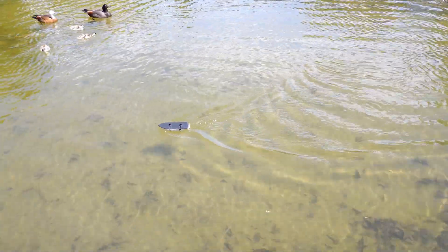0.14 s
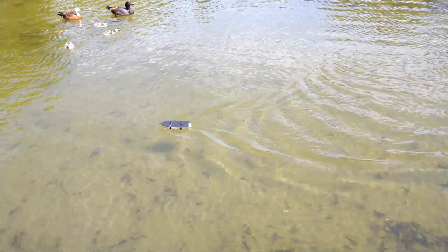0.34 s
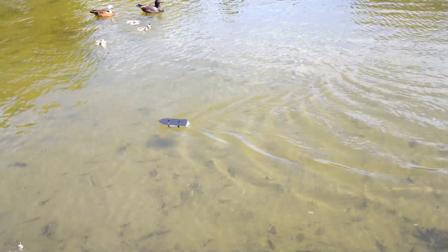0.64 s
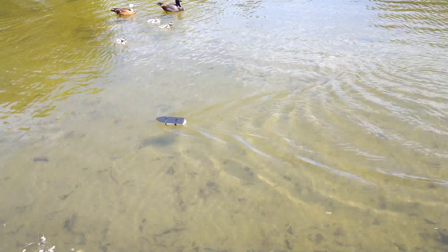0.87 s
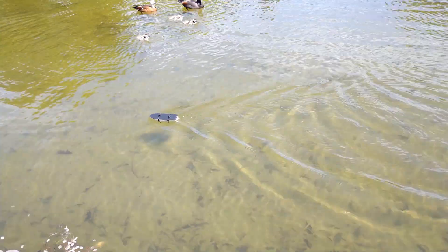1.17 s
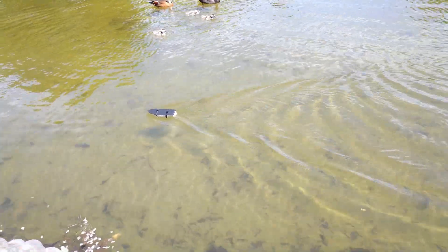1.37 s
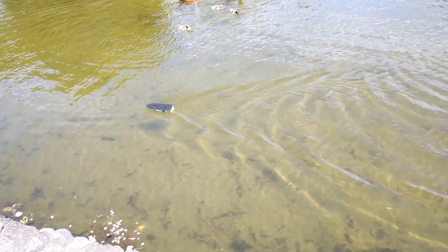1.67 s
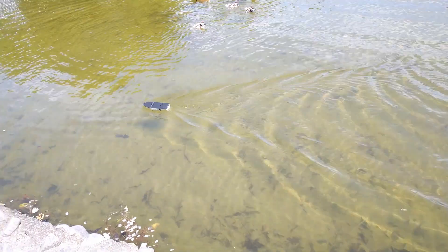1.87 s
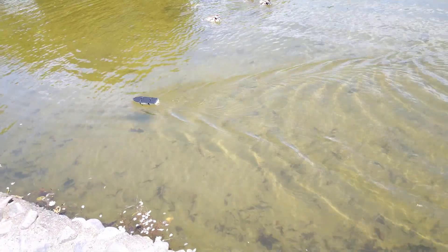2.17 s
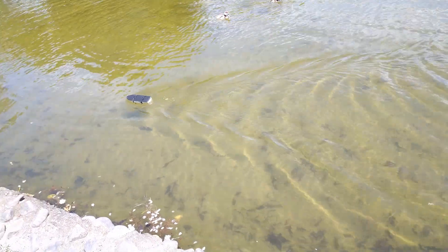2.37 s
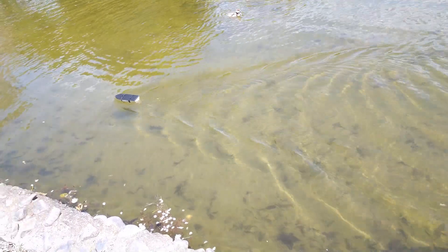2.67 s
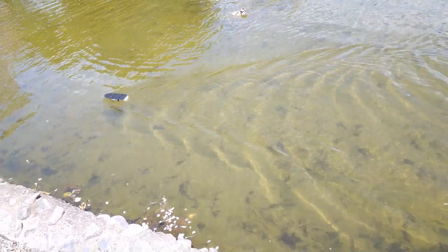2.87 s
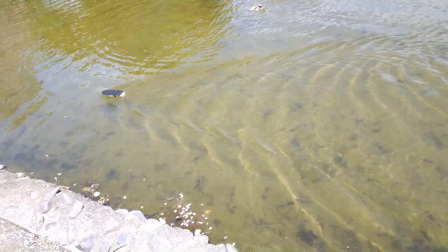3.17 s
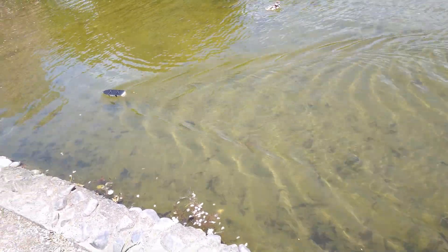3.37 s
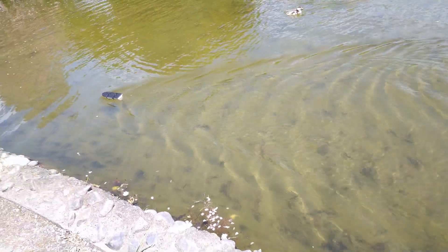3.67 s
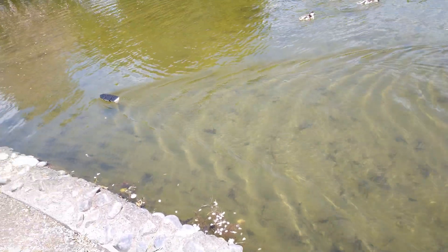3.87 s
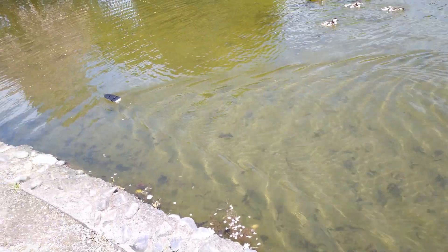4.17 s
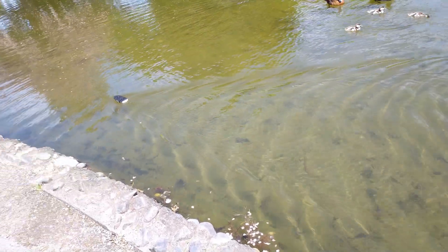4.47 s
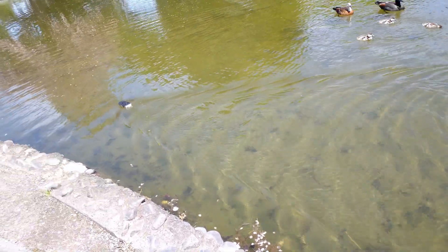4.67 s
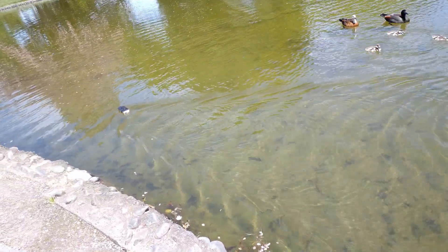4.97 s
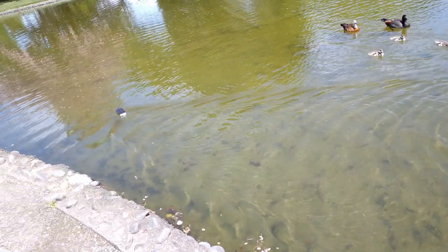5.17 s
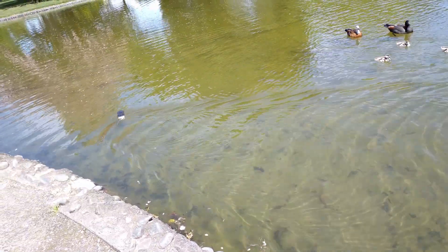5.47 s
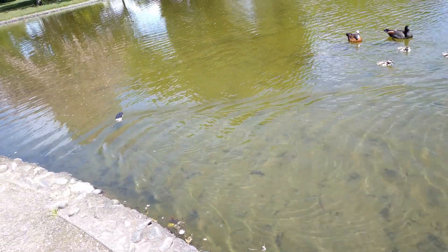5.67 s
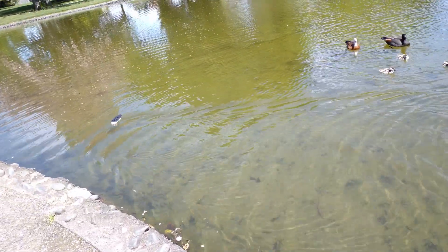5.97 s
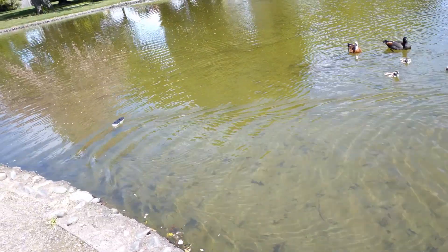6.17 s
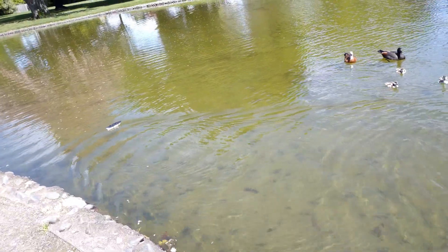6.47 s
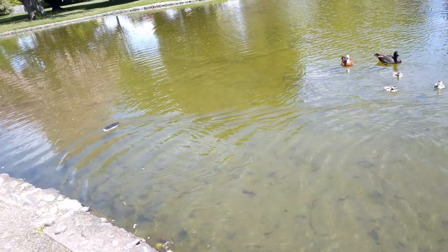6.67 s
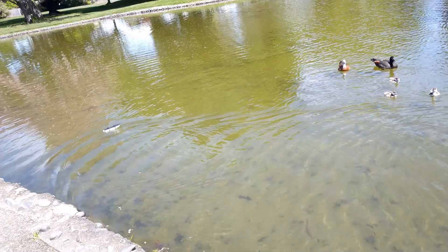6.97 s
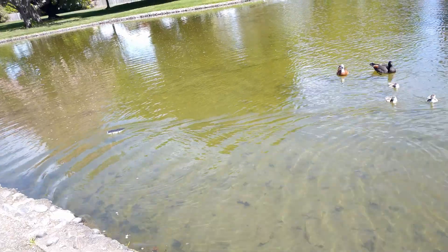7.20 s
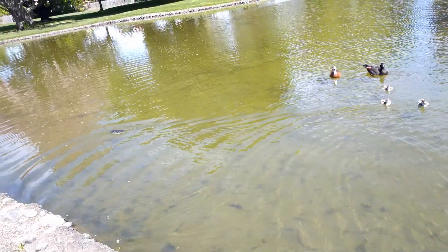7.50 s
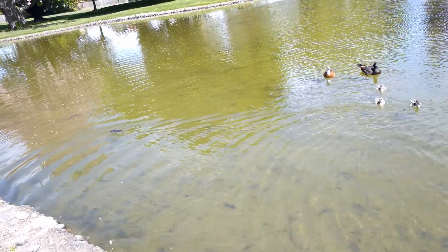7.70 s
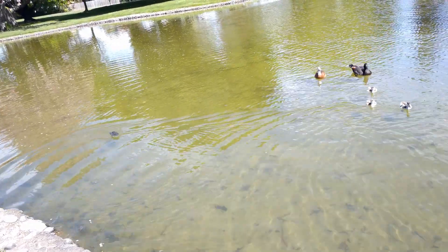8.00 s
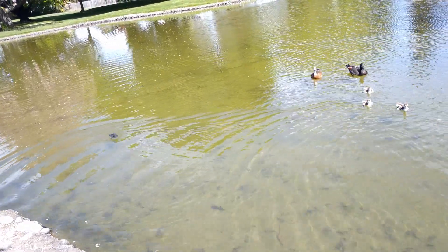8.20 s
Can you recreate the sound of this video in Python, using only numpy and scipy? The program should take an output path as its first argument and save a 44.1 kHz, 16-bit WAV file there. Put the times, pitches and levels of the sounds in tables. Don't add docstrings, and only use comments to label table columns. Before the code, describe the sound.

Outdoors by a park pond, a toy boat's small electric motor whines high and nasal with gritty brush hiss, wavering and weakening as it turns away. It coasts down and stops just after four seconds. Songbirds chirp throughout, small ripples plip against the stone edge, leaves rustle, and a far engine drone grows underneath. Small handheld microphone, dull above eight kilohertz.

```python
import sys
import numpy as np
from scipy import signal
from scipy.io import wavfile
from scipy.ndimage import uniform_filter1d, map_coordinates

SR = 44100
rng = np.random.default_rng(int(sys.argv[2]) if len(sys.argv) > 2 else 0)


def bounce(signal):
    frames = np.transpose(np.atleast_2d(signal))
    limited = np.clip(frames, -1, 1)
    pcm = np.round(limited * 32767).astype(np.int16)
    wavfile.write(sys.argv[1], SR, pcm)


def field_ratio(decibels):
    return 10 ** (np.asarray(decibels, dtype=float) / 20)


N = 367980


def unit(x):
    return x / np.sqrt(np.mean(x ** 2))


def curves(table):
    s, *columns = np.transpose(table)
    return [np.interp(np.arange(N) / SR, s, c, right=c[-1]) for c in columns]


def beam(t0, t1, in_db, before_db, after_db, edge_s):
    t = np.arange(N) / SR
    step_on = .5 + .5 * np.tanh((t - t0) / edge_s)
    step_off = .5 + .5 * np.tanh((t - t1) / edge_s)
    return before_db + (in_db - before_db) * step_on + (after_db - in_db) * step_off


def walk(rate_hz):
    held = 1.2 * rng.standard_normal(1100)
    return np.interp(np.arange(N) * (rate_hz / SR), np.arange(len(held)), held)


def band(x, hz, width_hz):
    return signal.lfilter(*signal.iirpeak(hz, hz / width_hz, fs=SR), x)


def steep_band(x, hz, width_hz):
    return band(band(x, hz, width_hz), hz, width_hz)


def hiss(hz, width_hz):
    return unit(steep_band(rng.standard_normal(N), hz, width_hz))


def add(out, s, piece):
    i = int(s * SR)
    out[i:i + len(piece)] += piece[:N - i]


def shaft_hz():
    # t/s, shaft speed f/Hz
    speed = [(0, 259.3), (.3, 258.4), (.55, 260.5), (.7, 255.8), (1.05, 254.8), (1.42, 256.7),
             (1.67, 259.5), (1.87, 261.8), (2.03, 266), (2.66, 263.3), (2.86, 262), (2.97, 257.3),
             (3.3, 255), (3.63, 255.8), (3.69, 262.3), (3.97, 260), (4.17, 255), (4.45, 246.3)]
    # t/s, rise/s, sag/s, gain f/Hz
    surges = [
        (.3, .07, .18, 3.5),
        (1.05, 0.039, .14, 3),
        (1.42, .14, .11, 7.5),
        (1.67, .09, .11, 2),
        (2.2, .13, 0.13, -2),
        (3.06, .04, .12, 2.4),
        (3.3, .11, .18, 7.5),
        (3.97, .11, .09, 4),
    ]
    t = np.arange(N) / SR
    hz = curves(speed)[0]
    for s, rise_s, sag_s, gain_hz in surges:
        hump = np.interp(t, [s, s + rise_s, s + rise_s + sag_s], [0, 1, 0])
        hz = hz + gain_hz * np.sin(np.pi / 2 * hump)
    return hz


def commutator(turn, coast_db):
    # t/s, level/dB
    tenth_level = [(0, -43), (.2, -48.5), (.55, -48.5), (.67, -52.5), (.93, -56), (1.03, -45), (1.1, -50),
                   (1.27, -46.5), (1.4, -55.5), (1.52, -47), (1.66, -54.5), (1.86, -59), (2.03, -52.5),
                   (2.2, -61), (2.86, -63), (2.96, -51.5), (3.3, -50), (3.38, -61)]
    # multiple, early level/dB, late level/dB
    orders = [(3, -18, -18), (4, -9, -19), (7, -11, -18), (8, -6, -16), (11, -16, -12), (12, -7, -13),
              (15, -11, -17), (17, -12, -17), (23, -10, -13), (24, -15, -13), (25, -12, -16),
              (26, -14, -15), (27, -19, -21), (28, -16, -21), (29, -9, -18), (31, -16, -15), (32, -16, -22),
              (21, -11, -13)]
    base_db = -52
    strong_db = [(10, curves(tenth_level)[0]),
                 (20, beam(1.8, 3.35, in_db=-51.5, before_db=-58, after_db=-57, edge_s=.25) + coast_db),
                 (30, beam(.66, 1.46, in_db=-57, before_db=-66, after_db=-67, edge_s=.066) + coast_db)]
    out = np.zeros(N)
    for k, db in strong_db:
        out += field_ratio(db + 4.5 + 1.3 * walk(15)) * np.sin(k * turn)
    turned = np.clip((np.arange(N) / SR - 1.2) / .33, 0, 1)
    for k, early_db, late_db in orders:
        db = base_db + early_db + (late_db - early_db) * turned + coast_db / 2
        db = db + 2.5 * walk(3) + 1.5 * walk(25)
        out += field_ratio(db) * np.sin(k * turn + k * k)
    return out


def brushes(turn):
    # t from/s, t to/s, level in beam/dB, level before/dB, level after/dB
    brush_beams = [
        (0.15, 1.63, -45.5, -43.5, -49),
        (1.1, 3.6, -50.5, -49, -53.5),
        (0.6, 2.8, -55, -59, -67),
    ]
    # f/Hz, width f/Hz, level/dB
    hull = [
        [(2240, 1180, -6.5), (3060, 150, -8), (3900, 690, -12.5)],
        [(5450, 470, -3), (6500, 1800, -11)],
        [(7560, 650, 0), (8280, 420, -4)],
    ]
    scrape_db, wear_per_s = -6, 3.5
    beat = 1 + .5 * np.sin(turn)
    bumps = rng.standard_normal((40, 128))
    place = [np.arange(N) / SR * wear_per_s, turn / (2 * np.pi) % 1 * bumps.shape[1]]
    scrape = map_coordinates(bumps, place, order=1, mode="grid-wrap")
    out = np.zeros(N)
    for row, modes in zip(brush_beams, hull):
        register = np.zeros(N)
        for hz, width_hz, mode_db in modes:
            ring = beat * hiss(hz, width_hz) + field_ratio(scrape_db) * unit(steep_band(scrape, hz, width_hz))
            register += field_ratio(mode_db + 1.5 * walk(9)) * ring
        out += field_ratio(beam(*row, edge_s=.13) - 1) * register
    return out


def motor():
    throttle_off_s, coast_db_per_s = 4.1, -70
    t = np.arange(N) / SR
    turn = 2 * np.pi * np.cumsum(shaft_hz() * (1 + .00049 * walk(60))) / SR
    coast_db = coast_db_per_s * np.clip(t - throttle_off_s, 0, 1)
    running = np.clip((4.47 - t) / .14, 0, 1)
    return (commutator(turn, coast_db) + brushes(turn)) * running


def ripples():
    # t/s, peak level/dB, ring f/Hz
    plips = [(.5222, -41, 1400), (2.4095, -41, 1440), (2.969, -32.5, 1534), (3.0627, -36, 1480),
             (4.2345, -37, 1554), (4.328, -36, 1510), (4.7117, -42.5, 1620), (4.745, -41, 1540),
             (4.796, -40, 1510), (4.89, -30, 1550), (5.1592, -35, 1580), (5.247, -37, 1640),
             (5.5182, -38.5, 1560), (5.9226, -38, 1600), (6.0222, -41, 1520), (6.189, -42, 1530),
             (6.34, -37, 1680), (6.385, -48, 1470), (7.209, -40, 1440), (7.863, -33.5, 1560),
             (8.176, -42, 1510), (8.2113, -40.5, 1510), (6.203, -33.5, 1570), (2.175, -32, 1425),
             (5.408, -42, 720), (5.429, -47.5, 750)]
    # t/s, peak level/dB, ring f/Hz
    laps = [(1.5422, -39.5, 1522), (1.7912, -38, 1450), (2.6847, -39, 1480), (3.1527, -42, 1470),
            (3.3078, -41, 1640), (3.5492, -39, 1500), (4.0531, -40, 1550), (4.3898, -36, 1550),
            (4.5688, -42, 1490), (4.6666, -40, 1670), (5.2219, -42, 1670), (5.3366, -46, 1500),
            (5.4883, -42, 1480), (5.6635, -40, 1720), (5.7232, -40, 1670), (5.7427, -40, 1520),
            (5.8639, -39, 1530), (6.0096, -38, 1600), (6.156, -43, 1510), (6.3703, -41, 1570),
            (6.918, -45, 1720), (7.375, -41, 1600), (7.5521, -41, 1520), (6.5121, -40, 1550),
            (6.8708, -37, 1550), (7.7526, -40, 1480), (7.9721, -40, 1520), (8.0819, -43, 1500),
            (8.1283, -44, 1440), (8.2699, -40, 1930), (4.2133, -40, 1500), (4.408, -37, 1550),
            (4.683, -40, 1500), (4.7765, -41, 1550), (5.1242, -39, 2100), (5.262, -39, 1700),
            (5.8336, -42, 1550), (5.9823, -40, 1600), (6.5759, -43, 1550), (6.7745, -39, 1550),
            (6.9491, -40, 1600), (6.967, -41, 1550), (7.0419, -42, 1550), (7.2988, -41, 1550),
            (7.4988, -40, 1520), (7.642, -40, 1550), (7.7887, -42, 1500), (8.0645, -39, 1520),
            (7.388, -41, 1600), (7.415, -40, 2400)]
    # t/s, peak level/dB, ring f/Hz
    splashes = [(1.6759, -45, 1466), (1.855, -42.5, 1450), (2.4863, -40.5, 1480), (2.6163, -38, 1496),
                (3.024, -41, 1448), (3.2224, -39.5, 1430), (3.931, -39, 1511), (4.114, -34, 1490),
                (6.7355, -43, 1540), (7.096, -41.5, 1663), (8.008, -42, 1540), (6.385, -38.5, 1500),
                (6.418, -38.5, 1800), (6.435, -45, 1600), (6.217, -44, 1500), (4.667, -45, 1600),
                (6.872, -41, 1550), (6.512, -46, 1500), (6.605, -46, 1550), (6.176, -45, 1500),
                (6.222, -45, 1500), (3.59, -39.5, 1554), (5.002, -42.5, 1900), (7.444, -43, 1600),
                (7.46, -43, 1520), (6.143, -56, 1500), (6.177, -48, 1580), (.522, -42.5, 866),
                (2.267, -43, 720), (4.041, -44, 1060), (4.791, -44, 749), (7.002, -47, 726),
                (8.146, -54, 1010)]
    plip_spit_db, splash_spit_db = -13, 2.5
    a, b, c, d = rng.random((2200, 4)).T
    small = np.transpose([8.3 * a, -58 - 3.6 * np.log(b + .02), 1530 * 2 ** (.22 * (c - .5)), -7 + 11 * d])
    bunching_db = 2.2 * walk(6) + 1.6 * walk(25)
    small[:, 1] += bunching_db[(small[:, 0] * SR).astype(int)]
    small[:, 1] -= 1.7 * (small[:, 0] < 1.4)
    rows = [(*row, plip_spit_db) for row in plips]
    rows += [(s, db - 2, hz, plip_spit_db) for s, db, hz in laps]
    rows += [(*row, splash_spit_db) for row in splashes]
    s, db, hz, spit_db = np.vstack([rows, small]).T[:, :, None]
    t = np.arange(int(.02 * SR)) / SR
    ring = np.sin(2 * np.pi * hz * t) * (1 - np.exp(-t / .0004)) * np.exp(-(t / .0045) ** 1.3)
    noise = rng.standard_normal(ring.shape)
    spit = steep_band(noise, 2700, 2700) + field_ratio(1) * band(noise, 900, 550)
    spit = spit * np.exp(-t / .0044)
    out = np.zeros(N)
    for when, piece in zip(s[:, 0], field_ratio(db + 2) * (ring + field_ratio(spit_db + 5.5) * spit)):
        add(out, when, piece)
    return out


def engine():
    # t/s, firing rate f/Hz, swell level/dB
    firing = [(0, 70, -3), (3.4, 73, -2), (4.15, 78, 1), (4.8, 82, -1), (5.1, 84, 1), (5.35, 84, -4),
              (5.6, 84, 1), (6.1, 86, 1), (6.5, 85, -3), (7.2, 88, 4), (7.55, 88, -3), (8.34, 91, -1)]
    hz, swell_db = curves(firing)
    turn = 2 * np.pi * np.cumsum(hz + 1.5 * walk(9)) / SR
    tone = field_ratio(2.2 * walk(12)) * np.sin(turn)
    octave = field_ratio(-12 + 3.3 * walk(5)) * np.sin(2 * turn)
    return unit(field_ratio(swell_db) * (tone + octave))


def traffic():
    drone_db = beam(3.5, 7, in_db=-46, before_db=-62.5, after_db=-47, edge_s=.6)
    return field_ratio(drone_db - 3.5) * (.6 * hiss(84, 26) + .72 * engine())


def park():
    # t/s, level/dB
    gust = [(0, -49.5), (.83, -48.5), (1.5, -49.5), (2.5, -48.5), (4.16, -49.5), (4.48, -52.5),
            (4.85, -51.5), (5.2, -54.5), (5.5, -54.5), (5.9, -53.5), (6.2, -53), (6.3, -57), (6.5, -55),
            (6.74, -49.5), (7.0, -50), (7.35, -52), (7.9, -50.5), (8.34, -50.5)]
    # f/Hz, density level/dB per Hz
    air_spectrum = [(12, -39), (20, -5), (91, 0), (445, -21), (719, -19.5), (879, -18), (1130, -15),
                    (1320, -18.5), (1530, -13.5), (1830, -17.5), (2670, -13.5), (3030, -23), (4100, -25.5),
                    (7500, -58.5), (8300, -44.5), (10800, -78.5), (18300, -120)]
    rustle_db = curves(gust)[0]
    hz_points, db_points = np.transpose(air_spectrum)
    swell_db = .7 * walk(11) + 1.9 * walk(45)
    swell_db = swell_db + .4 * (rustle_db + 52)
    air = np.zeros(N)
    for hz in 22 * 2 ** np.arange(0, 8.7, 1 / 3):
        db = np.interp(np.log(hz), np.log(hz_points), db_points) + 10 * np.log10(hz)
        air += field_ratio(db + swell_db * min(hz / 1500, 1) + walk(8)) * hiss(hz, hz / 3)
    late_treble_db = -24 + beam(6.7, 9, in_db=7, before_db=0, after_db=0, edge_s=.1)
    leaves = hiss(4270, 2300) + field_ratio(late_treble_db) * hiss(7500, 1300)
    leaves = leaves * field_ratio(rustle_db - 2.5 + 1.2 * walk(14))
    return field_ratio(-45.5) * unit(air) + leaves


def chatter():
    # t/s, length/s, centre f/Hz, width f/Hz, level/dB
    patches = [(0, .2, 2150, 600, -52), (0, .33, 300, 150, -60), (4.545, .055, 3900, 900, -53),
               (7.25, .28, 4200, 3000, -51.5), (4.62, .06, 3800, 500, -56), (3.0, .06, 3150, 500, -54),
               (2.24, .06, 3000, 600, -53), (4.22, .05, 2900, 700, -50), (1.23, .07, 3100, 500, -52),
               (3.68, .05, 3300, 700, -55), (0, 0.4, 6660, 300, -58), (3.498, 0.082, 3200, 1200, -49),
               (7.032, 0.055, 2050, 200.1, -55), (4.79, 0.055, 4200, 1500, -50),
               (4.897, 0.18, 4000, 500, -58), (6.66, 0.26, 5430, 1000, -57),
               (7.082, 0.12, 4300, 1200, -49.5), (7.63, 0.042, 4170, 500, -54),
               (7.78, 0.11, 4400, 900, -56.5), (7.965, 0.09, 4250, 900, -48.5),
               (8.04, 0.077, 4170, 300, -58), (8.258, 0.17, 5600, 500, -55), (8.29, 0.06, 6400, 500, -56.5),
               (8.24, 0.051, 7500, 401, -58)]
    out = np.zeros(N)
    for s, length_s, hz, width_hz, db in patches:
        noise = rng.standard_normal(SR // 3)[:int(length_s * SR)]
        swell = np.hanning(len(noise)) ** .5
        add(out, s, field_ratio(db + 2) * swell * unit(steep_band(noise, hz, width_hz)))
    return out * field_ratio(1.4 * walk(70))


def birds(notes, rough, edge, warble_hz):
    out, flutter = np.zeros(N), walk(250)
    for s, length_s, a_hz, b_hz, c_hz, db in notes:
        u = np.linspace(-1, 1, int(length_s * SR))
        hz = b_hz + (c_hz - a_hz) / 2 * u + ((a_hz + c_hz) / 2 - b_hz) * u ** 2
        warble = np.resize(flutter[int(s * SR):][:len(u)], len(u))
        hz = hz + warble_hz * warble * abs(c_hz - a_hz) / 1000
        tone = np.sin(2 * np.pi * np.cumsum(hz) / SR)
        add(out, s, field_ratio(db + 4.5) * (1 - u ** 2) ** edge * tone)
    return out * (1 + rough * unit(uniform_filter1d(rng.standard_normal(N), size=90)))


def glides(rows):
    sag = .52
    return [(s, length_s, a, a + sag * (b - a), b, db) for s, length_s, a, b, db in rows]


def phrases(rows, parts):
    notes = []
    for s, k, db, rest_db in rows:
        for lag_s, length_s, a, b, c, part_db in parts:
            later_db = rest_db * (lag_s > .005)
            notes.append((s + lag_s, length_s, k * a, k * b, k * c, db + part_db + later_db))
    return notes


def sweeps():
    # t/s, length/s, start f/Hz, end f/Hz, level/dB
    sweep_rows = [(.319, 0.03, 4140, 2960, -44.5), (.466, 0.03, 3900, 3050, -47), (.925, .03, 4500, 3580, -49),
                  (1.028, .018, 4000, 3620, -48), (1.005, .025, 4100, 4600, -52), (1.192, .04, 5060, 5400, -45),
                  (1.114, .025, 5100, 3660, -43), (2.095, 0.028, 6280, 6380, -51),
                  (2.115, .028, 6370, 5450, -47.5), (2.133, 0.039, 5270, 3900, -46),
                  (2.165, 0.025, 3952, 3820, -41), (2.183, 0.021, 3770, 4020, -43.5), (2, 0.016, 4000, 2900, -49),
                  (2.202, .016, 4050, 3000, -49), (2.998, .028, 3380, 2950, -45), (3.022, .016, 2900, 2500, -48),
                  (4.575, .024, 2950, 3700, -53), (2.558, .025, 5500, 5800, -52), (2.645, .025, 3150, 3200, -50),
                  (2.58, 0.045, 5500, 2800, -45.5), (3.422, .035, 3780, 4300, -52), (3.465, .02, 4100, 4600, -51),
                  (3.485, 0.018, 4600, 4100, -48.5), (3.536, 0.05, 3500, 2600, -52),
                  (3.89, 0.02, 5050, 4400, -51), (3.905, .02, 4700, 4400, -51), (3.922, 0.018, 4100, 3450, -46),
                  (3.94, .014, 2950, 2500, -51), (3.99, .028, 4700, 3550, -49), (4.02, .018, 3550, 3050, -48),
                  (4.335, 0.07, 2480, 1980, -48), (4.543, 0.029, 5100, 2900, -54), (4.672, 0.06, 3680, 2930, -48),
                  (4.422, .028, 4080, 4780, -47.5), (4.815, 0.022, 5100, 3000, -50), (4.8, .018, 4400, 5250, -46),
                  (4.21, .03, 2200, 2550, -50), (4.285, 0.055, 5100, 4850, -60), (2.672, .03, 2250, 1700, -52),
                  (4.09, .02, 5000, 4400, -52),
                  (5.41, 0.032, 4700, 3270, -51.5), (5.564, 0.026, 5600, 4300, -54),
           (5.717, 0.048, 2900, 2250, -51), (5.8, .03, 3200, 2900, -56), (7.632, .012, 4500, 3900, -50),
           (7.205, .012, 3100, 2500, -48), (5.831, 0.055, 3080, 2480, -51), (6, 0.064, 3100, 2450, -52),
           (6.052, 0.045, 3300, 2350, -48), (6.528, 0.035, 4500, 3100, -51), (6.536, .018, 4280, 4200, -52),
           (6.565, .017, 4420, 3800, -51), (6.578, .017, 3800, 4600, -53), (6.59, .025, 2830, 2900, -51),
           (6.727, .02, 4440, 3900, -49), (6.75, 0.045, 4720, 2900, -54), (6.832, .02, 3230, 2720, -50),
           (6.844, .02, 2700, 3340, -53), (8.056, .025, 2330, 2240, -50), (5.898, 0.017, 5830, 5330, -57),
           (8.062, .035, 3150, 2400, -53), (8.265, .04, 6900, 6500, -57), (8.265, .03, 5800, 5500, -55),
           (5.48, 0.024, 2520, 2350, -64)]
    return birds(glides(sweep_rows), rough=.36, edge=.6, warble_hz=90)


def peep_notes():
    # t/s, length/s, top f/Hz, level/dB, lean (-1 rising to 1 falling)
    peeps = [(.378, 0.022, 3160, -44, .01), (.541, 0.026, 2474, -45, 0.5), (2.197, 0.031, 2600, -48, 0),
             (2.227, .035, 2650, -47, 0.8), (2.646, 0.031, 2530, -43, 0.5), (2.671, .03, 2036, -53, 3),
             (4.042, 0.038, 2686, -43.5, .3), (4.58, 0.018, 3420, -52, -1.5),
             (4.628, 0.026, 2520, -49.5, 0.5), (4.769, 0.045, 3000, -48, -.3),
             (4.863, 0.015, 2990, -46, 0.5), (5.7, .02, 3780, -54, 1), (5.963, .035, 2300, -49.5, .3),
             (6.018, 0.036, 3780, -41.5, .6), (6.045, .014, 3300, -46, 3), (7.55, 0.046, 2680, -47.5, -1.1),
             (6.601, .035, 2350, -52, 1.6), (7.644, 0.036, 2600, -44.5, 1.5),
             (7.765, 0.035, 2720, -46.5, 1.5), (3.507, 0.039, 3450, -49, -0.5),
             (8.059, 0.037, 2830, -55, 0.5)]
    notes = []
    for s, length_s, hz, db, lean in peeps:
        depth = .11 * min(length_s / .04, 1.2)
        notes.append((s, length_s, hz * (1 - depth * (1 - lean)), hz, hz * (1 - depth * (1 + lean)), db))
    return notes


def trill_notes():
    trills = [
        (4.994, 7, .0772, 3660, -51),
        (5.299, 1, .076, 3100, -56),
        (5.376, 7, .0752, 3130, -50),
        (5.918, 1, .076, 3130, -50),
    ]
    fall = .91
    return glides([(s + gap_s * k, .026, hz, hz * fall, db)
                   for s, count, gap_s, hz, db in trills for k in range(count)])


def clear_calls():
    # t/s, pitch factor, level/dB, later parts over flick/dB
    finch = [
        (2.352, 1.0, -37.5, 0),
        (7.125, 0.98, -37.5, -3),
    ]
    # delay/s, length/s, start f/Hz, middle f/Hz, end f/Hz, level/dB
    song_parts = [
        (0, 0.022, 3920, 4450, 4880, -4.5),
        (0.009, .025, 4670, 3910, 3020, -2.5),
        (0.042, .037, 2930, 3180, 2850, 1),
        (0.077, 0.016, 2780, 2600, 2420, -9.5),
    ]
    notes = phrases(finch, song_parts) + peep_notes() + trill_notes()
    return birds(notes, rough=.22, edge=.6, warble_hz=40)


def sparrow():
    # t/s, pitch factor, level/dB, drop and tail over flick/dB
    chirp_times = [
        (0.573, 0.96, -43.5, 3),
        (1.193, 0.92, -41, 2),
        (2.968, 0.99, -39.5, 0),
        (3.66, 1, -42.5, -1),
        (4.19, 0.98, -38, -4),
        (4.802, 1.1, -51, -1),
    ]
    # delay/s, length/s, start f/Hz, middle f/Hz, end f/Hz, level/dB
    chirp_parts = [
        (0, .018, 3920, 4375, 4530, -3.5),
        (.014, .022, 4390, 3860, 3530, -2),
        (0.04, .03, 3500, 3200, 2850, -6.5),
    ]
    return birds(phrases(chirp_times, chirp_parts), rough=.55, edge=.7, warble_hz=150)


def whistles():
    # t/s, length/s, start f/Hz, end f/Hz, level/dB
    thin_notes = [
        (5.572, 0.14, 4205, 4150, -55),
        (5.77, 0.07, 4240, 4150, -53.5),
        (5.83, .11, 4160, 4100, -58),
        (6.9, .2, 1700, 1844, -58),
        (7.05, .42, 1865, 1900, -60),
        (7.95, 0.4, 1900, 1935, -62),
        (7.8, 0.1, 2600, 2570, -61),
    ]
    return birds(glides(thin_notes), rough=.5, edge=.4, warble_hz=300)


def trees(x, t60_s):
    t = np.arange(SR // 2) / SR
    tail = rng.standard_normal(len(t)) * np.exp(-np.log(1000) * t / t60_s) * (t > .004)
    return signal.fftconvolve(x, tail / np.sqrt(np.sum(tail ** 2)))[:N]


def scene():
    boat = motor()
    boat = boat + field_ratio(-20) * trees(boat, .3)
    song = sweeps() + clear_calls() + whistles()
    hoarse = sparrow()
    echoes = trees(field_ratio(-11) * song + field_ratio(-6) * hoarse, .39)
    flock = song + hoarse + chatter() + echoes
    return (boat + ripples() + traffic() + park() + flock)[None]


def band_limit(x):
    return signal.sosfilt(signal.butter(12, 15700, fs=SR, output="sos"), x)


def record(dry):
    droop = signal.sosfilt(signal.cheby1(8, .5, 7730, fs=SR, output="sos"), dry)
    cut = signal.sosfilt(signal.ellip(9, .5, 60, 8340, fs=SR, output="sos"), droop)
    return band_limit(cut + field_ratio(-97) * rng.standard_normal(dry.shape))


dry = scene()
out = record(dry)
bounce(out)
```